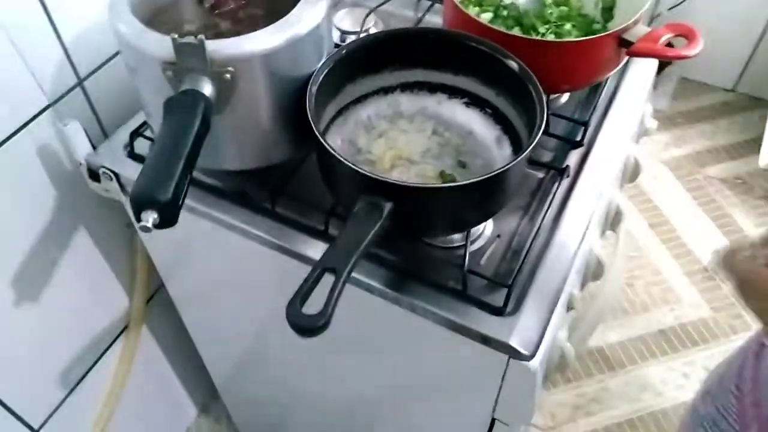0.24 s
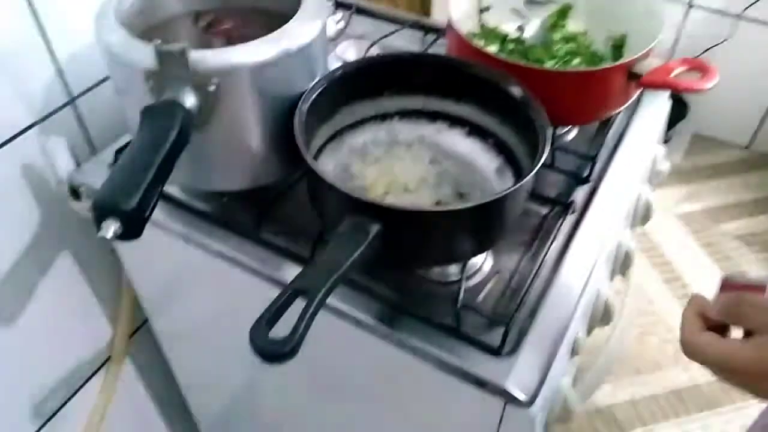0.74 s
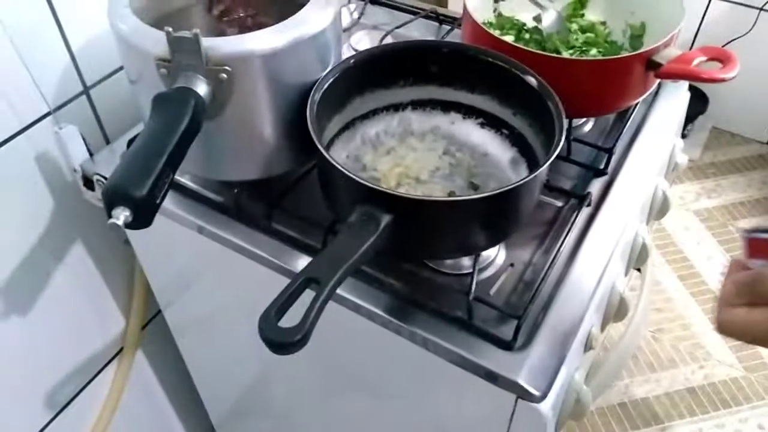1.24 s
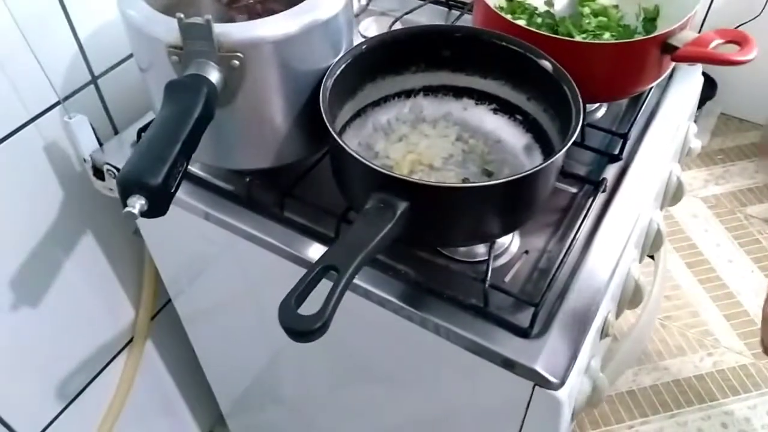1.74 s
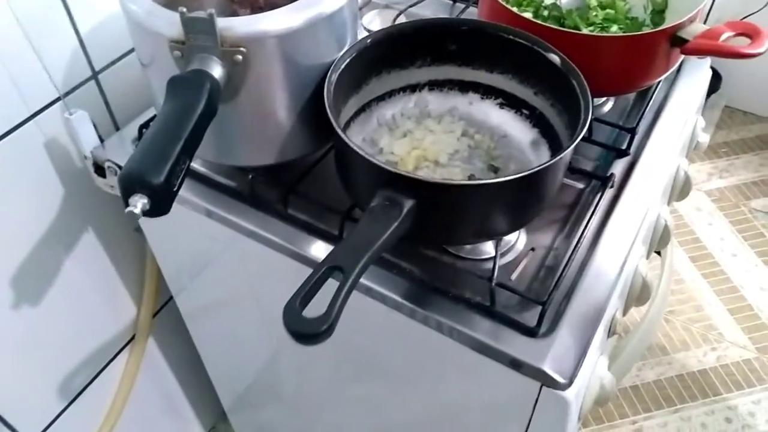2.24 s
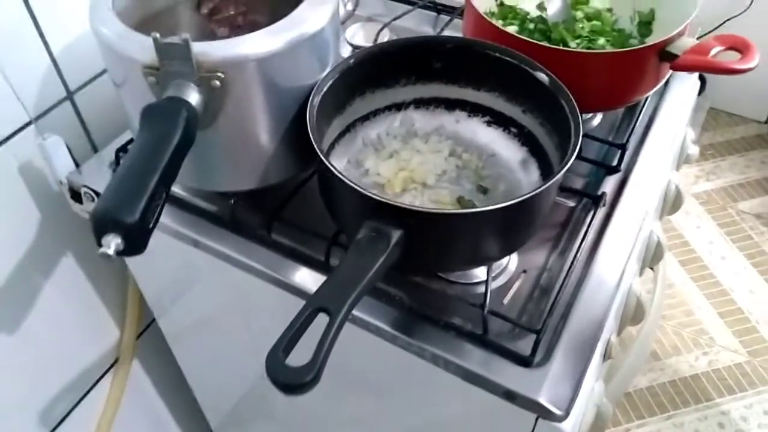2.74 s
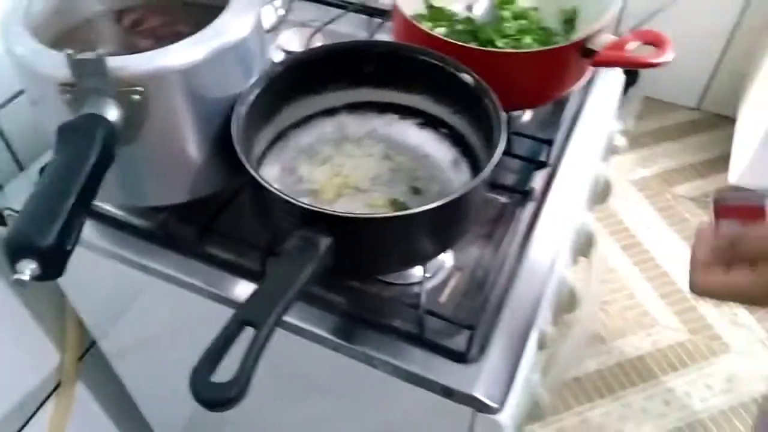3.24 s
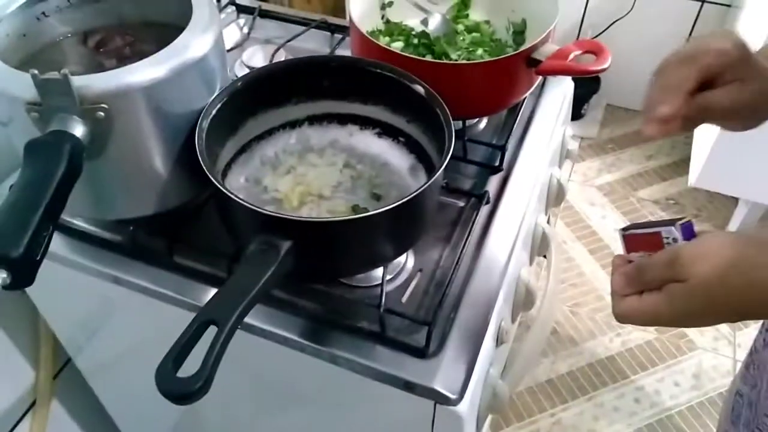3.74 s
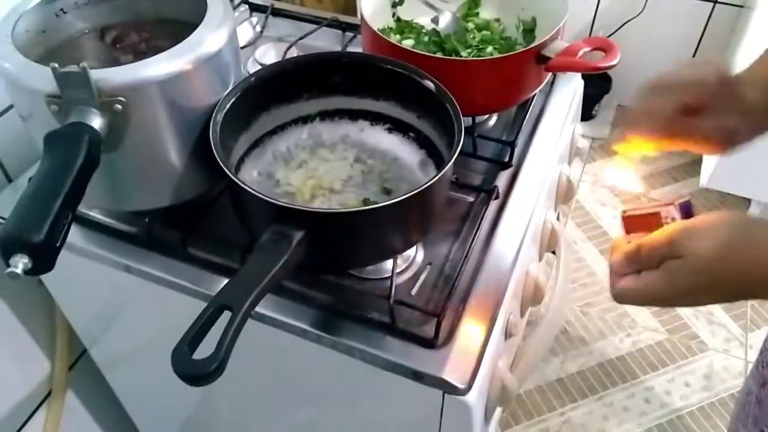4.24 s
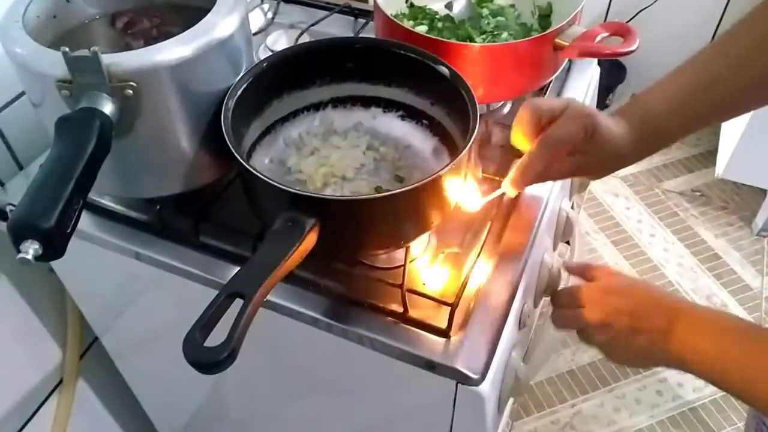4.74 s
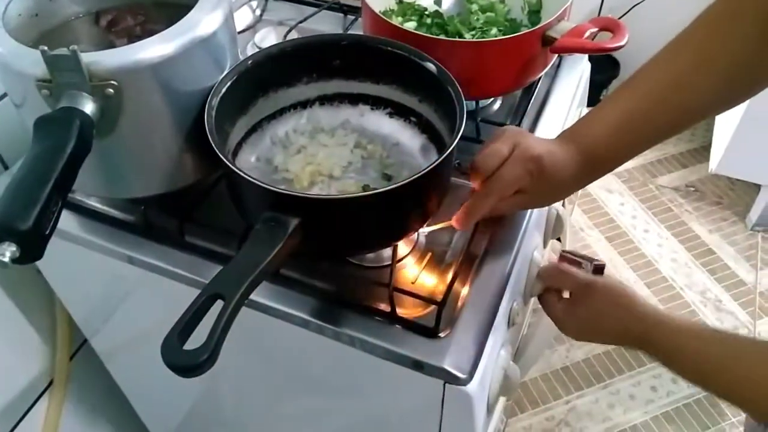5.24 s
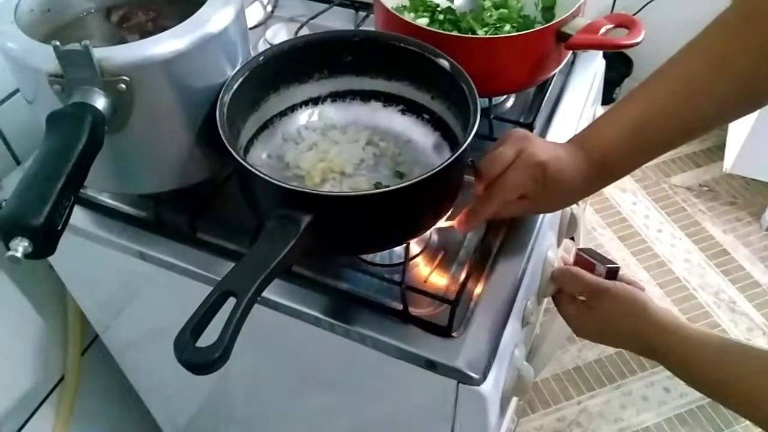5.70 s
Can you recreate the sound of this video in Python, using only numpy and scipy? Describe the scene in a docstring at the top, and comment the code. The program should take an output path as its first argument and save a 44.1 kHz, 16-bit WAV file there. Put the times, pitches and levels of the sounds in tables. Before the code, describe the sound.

A handheld stereo pickup hears faint stove hiss and hollow pot ringing. Matchsticks tick in a cardboard box, which clacks shut; a bright click briefly ducks the background. Then a match scratches and sputters, the gas knob chatters, and the burner lights with a soft boom. An engine outdoors gathers speed in the second half, droning through the room.

```python
"""A matchbox in a small tiled kitchen is rattled, slid open and snapped shut: friction grains and struck resonances.
A match is struck and flares as sputtering noise, a knob chatters, and a gas ring catches with a whoof and booms.
A pot hisses on the stove, as coloured noise with ringing air. Outside a vehicle gathers speed: engine
harmonics swell through the room's modes, over a road roar.
The snap and a sharp click at the microphone push the gain control down; the background creeps back after each."""
import sys
import numpy as np
from scipy import signal
from scipy.fft import rfft, irfft, next_fast_len
from scipy.io import wavfile
from scipy.ndimage import uniform_filter1d, minimum_filter1d

SR = 44100
rng = np.random.default_rng(int(sys.argv[2]) if len(sys.argv) > 2 else 0)


def file_out(sig):
    """Save sig as 16-bit WAV at sys.argv[1]."""
    # one column per channel
    cols = np.atleast_2d(sig).T
    # limit, then scale
    lim = np.clip(cols, -1, 1)
    pcm = np.round(lim * 32767).astype(np.int16)
    wavfile.write(sys.argv[1], SR, pcm)


N = 263056
TIME = np.arange(N) / SR
CUTOFF_HZ = 15500   # top of the band

# rubs of cardboard and sticks, among them the match on the strip at 3.95 s: (time [s], length [s],
# relative level [dB], treble [dB], resonance of the hollow box [Hz], resonance of its wall [Hz])
RUBS = [(-0.02, 0.041, -40, 7, 1510, 2480), (0.025, 0.11, -49, -4, 1560, 2360),
        (0.124, 0.076, -42.5, -19, 1410, 2740), (0.195, 0.031, -37, 2.5, 1520, 3040),
        (0.239, 0.04, -49, 4, 1510, 3060), (0.289, 0.04, -41, 9.5, 1550, 3280),
        (0.321, 0.037, -38, 4, 1680, 3420), (0.66, 0.057, -51.5, 10.5, 875, 4330),
        (1.283, 0.017, -31.5, 8, 1340, 3870), (1.649, 0.02, -35, -17, 2000, 3440),
        (1.669, 0.024, -28, 2.5, 1850, 3600), (1.79, 0.022, -53, 9, 1650, 3860),
        (2.364, 0.084, -51.5, -16, 1370, 4180), (2.483, 0.011, -40, -9, 1410, 3970),
        (2.98, 0.02, -48, -11, 1530, 1590), (3.946, 0.017, -25.5, 4.5, 965, 3770),
        (5.314, 0.078, -49, 4, 1670, 4160)]
# friction noise of the box: (frequency [Hz], density [dB per Hz])
FRICTION_SPECTRUM = [(100, -52), (400, -10), (750, 2), (1200, -5.5), (1650, 2.5), (2400, 5), (3400, -8.5),
                     (6000, -5.5), (10000, -13), (15000, -16)]


def scrapes(treble_hz=3500, wall_db=9.0):
    """Stick-slip friction: grains of contact excite the cavity and wall, each rub with its own treble."""
    grains = grit()
    body, bright = np.zeros(N), np.zeros(N)
    for s, length, db, treble_db, hollow_hz, wall_hz in RUBS:
        rub = from_db(db) * shaped(grains, rub_effort(s, length))
        hollow = resonance(rub, hollow_hz, width=280)
        wall = from_db(wall_db) * resonance(rub, wall_hz, width=290)
        body += rub + hollow + wall
        bright += rub * (from_db(treble_db) - 1)
    force = body + first_order_treble(bright, treble_hz)
    return from_db(6.0) * colour(force, FRICTION_SPECTRUM)


RUB_ATTACK, RUB_RELEASE = 0.26, 0.33   # rise time and decay constant, as shares of a rub's length


def rub_effort(start, length):
    """Envelope of a friction force: a linear rise, a hold and an exponential decay."""
    u = (TIME - start) / length
    return np.clip(u / RUB_ATTACK, 0, 1) * np.exp(-np.clip((u - 1) / RUB_RELEASE, 0, 20))


GRAINS_PER_S = 1300   # mean rate of tiny catches of one rough surface on the other, in each band


def grit(grain_spread_db=-1.0, smooth_share=0.39, slip_db=4.0, slips_per_s=230):
    """Random point process: fibres catch and slip on their own, so each band crackles in its own clumps."""
    out = 0
    edges_hz = np.geomspace(250, 16000, 7)   # octaves
    for low, high in zip(edges_hz, edges_hz[1:]):
        spread = np.minimum(rng.exponential(1, N), 3)
        sizes = from_db(grain_spread_db * spread) * rng.choice([-1, 1], N)
        catches = rng.random(N) < GRAINS_PER_S / SR
        grains = rms_one(sizes * catches) + smooth_share * rng.standard_normal(N)
        slips = from_db(slip_db * np.clip(drift(slips_per_s), -2, 2))
        band = signal.butter(2, [low, high], "band", fs=SR, output="sos")
        out = out + signal.sosfilt(band, grains * slips)
    return rms_one(out)


# knocks on the matchbox: (time [s], relative level [dB], crack relative to the knock [dB])
BOX_KNOCKS = [(0.201, -28, -13), (0.2195, -47, -5), (1.2802, -22, -22.5), (1.2817, -18, -24),
              (1.6763, 4.5, -23), (1.683, -19, -17), (1.6933, -26, -16)]
# modes of the hollow box: (frequency [Hz], level [dB], t60 [s])
BOX_MODES = [(830, -40, 0.024), (1076, -13, 0.012), (1440, -6, 0.0091), (1730, -8.5, 0.012),
             (3550, -25.5, 0.015), (6900, -13, 0.0025)]


def knocks(lowest_hz=380):
    """Impulse response: the drawer hits home with a crack and the brief ring of a box too small for bass."""
    crack = impulses([(s, db + crack_db) for s, db, crack_db in BOX_KNOCKS])
    hits = impulses([(s, db) for s, db, crack_db in BOX_KNOCKS])
    return high_pass(crack + ring(hits, BOX_MODES), lowest_hz)


# matchsticks tick against the box and each other: (time [s], relative level [dB], pitch [Hz])
STICK_TICKS = [(0.149, -37, 3080), (0.157, -32, 3050), (0.2018, -20, 2920), (0.208, -29, 1350),
               (0.214, -22, 3400), (0.2215, -22, 2900), (0.2265, -21, 3230), (0.232, -28, 3500),
               (0.235, -28, 3020), (0.3, -38, 1800), (0.3284, -33, 1680), (0.338, -21, 6100),
               (1.2885, -19.5, 3740), (1.296, -36, 3560), (1.3012, -28, 3470), (1.308, -22, 4370),
               (1.3283, -26, 3600), (1.334, -26, 3940), (1.654, -21.5, 2000), (1.655, -30, 3800),
               (1.6795, -16, 3750), (1.693, -17, 3400), (1.7075, -25, 4000), (2.446, -38, 1410),
               (2.4714, -33.5, 1520), (2.4874, -32, 3850), (2.4905, -27, 4100), (2.499, -35, 1350),
               (3.9482, -10, 11000), (3.9524, -22.5, 1170), (3.958, -30, 4100), (3.972, -26, 3800),
               (3.981, -28, 3200), (4.446, -30, 3850)]
STICK_CYCLES = 20   # t60 of a stick's fundamental, in cycles


def sticks(overtone=2.2, overtone_db=-9, crack_db=-3):
    """Modal decay of a struck bar: a dry crack, a fundamental and an overtone dying twice as fast."""
    out = 0
    for s, db, hz in STICK_TICKS:
        tap = impulses([(s, db)])
        t60 = STICK_CYCLES / hz
        overtone_hz = min(overtone * hz, CUTOFF_HZ)
        modes = [(hz, 0, t60), (overtone_hz, overtone_db, t60 / 2)]
        out = out + from_db(crack_db) * tap + ring(tap, modes)
    return high_pass(out, hz=710)


# the two impulses of a hard contact at the microphone: (time [s], relative level [dB])
CLICK_IMPULSES = [(3.3086, -4), (3.3103, 20.5)]


def sharp_click(crunch_db=-9.0):
    """Impulsive contact: two impulses, with a crunch of noise for a few milliseconds from the first."""
    contact = stroke(CLICK_IMPULSES[0][0], .002, edge=.4)
    crunch = from_db(crunch_db) * contact * rng.standard_normal(N)
    return high_pass(impulses(CLICK_IMPULSES) + crunch, hz=274)


# modes of the microphone's casing: (frequency [Hz], level [dB], t60 [s])
CASING_MODES = [(693, -56, 0.0018), (1850, -21.5, 0.0034), (3560, -19, 0.00097), (6660, -18, 0.004),
                (9040, -12, 0.0017), (11200, -10, 0.0012), (14100, -12, 0.00089)]


def casing_click():
    """Modal excitation: the sharp click is heard as the decaying ring of the casing."""
    return high_pass(ring(sharp_click(), CASING_MODES), hz=208)


# the gas knob turns in two short, hollow rasps: (time [s], length [s], relative level [dB])
KNOB_RASPS = [(5.066, 0.022, -26.5), (5.121, 0.03, -25.5)]
# resonances of the stove's front panel: (frequency [Hz], width [Hz], level [dB])
PANEL_MODES = [(717, 30, -6), (940, 170, -2.5), (1117, 23, -12)]


def knob(chatter_db=3, chatter_per_s=300, lowest_hz=600):
    """Forced vibration: the valve stem rubs and chatters, driving the thin panel at its resonances."""
    chatter = from_db(chatter_db * drift(chatter_per_s))
    rub = high_pass(rng.standard_normal(N) * chatter, lowest_hz)
    rung = 0
    for hz, width, db in PANEL_MODES:
        mode = resonance(resonance(rub, hz, width), hz, 2 * width)
        rung = rung + from_db(db) * rms_one(mode)
    return sum(from_db(db) * shaped(rung, stroke(s, length, edge=0.35)) for s, length, db in KNOB_RASPS)


# the match head bursts into flame with a broad rasp: (time [s], level [dB], decay constant [s])
IGNITION_RASP = [(3.965, -27.5, 0.1)]
# it flares as it catches and again as it is carried to the ring: (time [s], length [s], level [dB])
MATCH_FLARES = [(3.95, 0.14, -46), (4.44, 0.39, -47)]


def flare(fizz_hz=3900, width_hz=1300, sputter_db=3.0, crackle_db=4.0, spit_hz=2200, spit_width_hz=500):
    """Combustion noise: a crackling, dying rasp, then a narrow, sputtering fizz with lower, gritty spits."""
    (start, rasp_db, decay_s), = IGNITION_RASP
    burst = from_db(rasp_db) * (TIME > start) * np.exp(-np.abs(TIME - start) / decay_s)
    crackle = diffuse(N) * from_db(crackle_db * drift(250))
    rasp = burst * rms_one(colour(crackle, FRICTION_SPECTRUM))
    burn = sum(from_db(db) * stroke(s, length, edge=0.52) for s, length, db in MATCH_FLARES)
    narrow = resonance(resonance(diffuse(N), fizz_hz, width_hz), fizz_hz, 2 * width_hz)
    fizz = from_db(sputter_db * drift(130)) * rms_one(narrow)
    spits = rms_one(resonance(grit(), spit_hz, spit_width_hz))
    return rasp + burn * (fizz + spits)


# the knob lets gas hiss from the ring: (time [s], opening time [s], level [dB])
GAS_OPENING = [(5.085, 0.017, -52)]


def gas(lowest_hz=8000):
    """Turbulent jet noise: a thin, bright hiss that grows as the valve opens."""
    (start, opening_s, db), = GAS_OPENING
    flow = np.clip((TIME - start) / opening_s, 0, 1)
    jet = rms_one(high_pass(colour(diffuse(N), STOVE_HISS), lowest_hz))
    return flow * from_db(db) * jet


# the gas catching: (frequency [Hz], density [dB per Hz])
WHOOF_SPECTRUM = [(40, -30), (100, -10), (150, -14), (230, 6.5), (450, -2), (680, 0.5), (950, -9.5),
                  (2000, -29), (8000, -52)]
# the flame jumps round the ring in booming puffs, each sinking in pitch:
# (time [s], length [s], level [dB], pitch [Hz], glide [Hz per s])
FLAME_PUFFS = [(5.53, 0.028, -38, 133, -350), (5.578, 0.039, -32.5, 186, -900),
               (5.632, 0.045, -39.5, 146, -300)]


def burner(start=5.54, length=0.135, level_db=-35, flutter_hz=110, flutter=0.21,
           pan_hz=690, pan_width_hz=45, pan_db=6.0):
    """Amplitude modulation: the catching gas flutters and booms, and the resonance of the pan rings along."""
    phase = 2 * np.pi * np.cumsum(flutter_hz * (1 + 0.062 * drift(40))) / SR
    fluttering = diffuse(N) * np.exp(flutter * np.cos(phase))
    flame = stroke(start, length, edge=0.26) * rms_one(colour(fluttering, WHOOF_SPECTRUM))
    pan_ring = (from_db(pan_db) - 1) * resonance(flame, pan_hz, pan_width_hz)
    booms = 0
    for s, puff_length, db, hz, glide in FLAME_PUFFS:
        booms = booms + from_db(db) * tone(s, puff_length, hz, glide, waver=0.03, edge=0.64)
    return from_db(level_db) * (flame + pan_ring) + booms


# soft shuffling of hands and clothes: (time [s], length [s], level [dB])
CLOTH_SHUFFLES = [(0.392, 0.15, -51), (0.59, 0.17, -49), (1.068, 0.11, -52), (1.48, 0.061, -77),
                  (2.851, 0.22, -46.5)]
# its dull colour: (frequency [Hz], density [dB per Hz])
CLOTH_SPECTRUM = [(30, -3), (120, -4), (380, 18.5), (750, 13.5), (1300, 9.5), (2000, 6), (6000, -95)]


def shuffles():
    """Modulated friction noise: dull, lumpy rustles as the cook moves."""
    effort = sum(from_db(db) * stroke(s, length, edge=0.37) for s, length, db in CLOTH_SHUFFLES)
    lumps = from_db(3 * drift(50))
    return effort * lumps * rms_one(colour(diffuse(N), CLOTH_SPECTRUM))


# the engine picks up speed: (time [s], firing rate [firings per s])
FIRING_RATE = [(2.4, 39.7), (3.1, 42.3), (3.4, 43), (3.7, 45.6), (4.15, 47.5), (4.5, 48), (4.79, 50.6),
               (5.2, 51.5), (5.5, 52.3), (5.96, 55.3)]
# its hum grows as it works harder: (time [s], level before weighting by harmonic [dB])
ENGINE_EFFORT = [(0, -17), (2.3, -19), (2.8, -3), (3.25, -4.5), (3.5, -4), (4.0, 1.5), (4.45, -1),
                 (4.75, 0.5), (5.0, 1.5), (5.96, 0.5)]
# harmonics: (multiple of the firing rate, relative level [dB], left minus right [dB], left lead [rad])
ENGINE_HARMONICS = [(1, 1.5, 0, 0.3), (2, 0, -6, 1.17), (3, -1, -16, 0.71), (4, 2.5, -4, 0.7),
                    (5, 0.5, -1, 0.62), (6, -0.5, -5, 0.6), (7, 1, -4, 0.6)]
# room modes that pick out the harmonics: (frequency [Hz], width [Hz], gain [dB])
ROOM_MODES = [(54.7, 3.5, -49.5), (86.2, 10.3, -47.5), (101.6, 5.1, -44.5), (146.8, 6, -48.5),
              (206, 6.2, -54), (222.5, 7.1, -47), (256, 8, -50.5), (320.7, 14, -53), (364.4, 15, -56.5)]
# road roar heard indoors: (frequency [Hz], density [dB per Hz])
ROAR_SPECTRUM = [(25, -30), (45, -17), (70, -16), (120, 0.5), (280, 6), (500, 0), (850, -0.5), (1300, -5.5),
                 (1900, -9), (3500, -18), (6000, -26), (15000, -38)]
ROAR_DB = -32.5   # mean level of the roar at the nearest point
# time of nearest approach, distance then, and the constant speed that shapes the roar's level
PASS_S, DISTANCE_M, SPEED_M_PER_S = 4.777, 6.58, 17.6


def vehicle(rough_db=1.5, brighten=0.75):
    """Harmonic series through room modes, the upper harmonics growing fastest; the roar follows 1/distance."""
    firing_hz, = in_time(FIRING_RATE)
    hum_db, = in_time(ENGINE_EFFORT)
    distance_m = np.hypot(SPEED_M_PER_S * (TIME - PASS_S), DISTANCE_M)
    nearness = DISTANCE_M / distance_m
    phase = 2 * np.pi * np.cumsum(firing_hz * (1 + 0.0065 * drift(13))) / SR
    engine = 0
    for k, db, pan_db, lead in ENGINE_HARMONICS:
        start_phase = rng.uniform(0, 2 * np.pi)
        wave = np.sqrt(2) * np.sin(k * phase + start_phase + np.array([[lead], [0]]))
        level_db = db + hum_db * k ** brighten + rough_db * drift(8)
        engine = engine + pan(pan_db) * wave * from_db(level_db)
    hum = 0
    for k, (hz, width, db) in enumerate(ROOM_MODES):
        hum = hum + (-1) ** k * from_db(db) * resonance(engine, hz, width)   # neighbours in opposite phase
    surges = from_db(.7 * drift(14))
    roar = surges * rms_one(colour(diffuse(N), ROAR_SPECTRUM))
    return hum + from_db(ROAR_DB) * nearness * roar


# other low tones in the traffic: (time [s], length [s], level [dB], pitch [Hz], glide [Hz per s],
# left minus right [dB])
TRAFFIC_TONES = [(3.09, 0.19, -49.5, 335, 27, -4), (3.55, 0.75, -46.5, 235, -9, -3),
                 (4.06, 0.4, -44, 336, -2, -7), (4.59, 0.13, -43, 338, 30, -1)]


def drones():
    """Gliding sinusoids: low tones swell and fade in the sound of the street."""
    out = 0
    for s, length, db, hz, glide, pan_db in TRAFFIC_TONES:
        out = out + from_db(db) * pan(pan_db) * tone(s, length, hz, glide, waver=0.008, edge=0.45)
    return out


# hiss of the stove and room: (frequency [Hz], density [dB per Hz])
STOVE_HISS = [(25, -30), (50, 3), (70, 2), (95, 11.5), (200, 4), (400, 1.5), (800, -10), (1300, -30),
              (2000, -65), (2500, -3), (3100, -7), (4200, -5.5), (8000, -5.5), (15000, -14.5)]
# gain of the treble in the hiss: (time [s], gain [dB])
TREBLE_GAIN = [(0, 5), (0.6, -0.5), (0.76, 2), (0.95, 1), (1.6, 1.5), (2.0, 0.5), (2.39, 0), (2.44, 6.5),
               (2.6, 2.5), (3.2, 3), (3.8, 3.5), (4.56, 3.5), (4.68, 4), (5.0, 1), (5.96, 2)]
# air ringing in the pots: (frequency [Hz], width [Hz], level [dB])
POT_MODES = [(669, 64, -56.5), (901, 14, -66), (1178, 29, -61), (1731, 23, -59)]
HISS_DB = -47   # level of the hiss before the treble gain
MAINS_HZ, MAINS_DB = 119, -62   # a kitchen appliance hums throughout


def stove(treble_hz=4200):
    """Broadband noise and cavity resonance: a hiss of varying treble, the pots' hollow ring and a faint hum."""
    hiss = from_db(HISS_DB) * rms_one(colour(diffuse(N), STOVE_HISS))
    sizzle_db, = in_time(TREBLE_GAIN)
    treble = first_order_treble(hiss, treble_hz)
    air = diffuse(N)
    pots = sum(from_db(db) * rms_one(resonance(air, hz, width)) for hz, width, db in POT_MODES)
    mains = from_db(MAINS_DB) * np.sqrt(2) * np.sin(2 * np.pi * MAINS_HZ * TIME)
    return hiss + (from_db(sizzle_db) - 1) * treble + pots + mains


# kitchen reverberation: (frequency [Hz], t60 [s])
KITCHEN_T60 = [(150, 0.36), (1200, 0.5), (4000, 0.46), (8000, 0.42), (15000, 0.38)]


def kitchen(x, build_s=0.00014):
    """Reverberation by convolution: dense echoes off the tiles, each band decaying at its own rate."""
    t, out = TIME[:SR // 2], 0
    echoes = diffuse(len(t))
    edges_hz = np.geomspace(80, 18000, 9)
    spectrum, hz = rfft(echoes), np.fft.rfftfreq(len(t), 1 / SR)
    for low, high in zip(edges_hz, edges_hz[1:]):
        band = irfft(spectrum * ((hz >= low) & (hz < high)), len(t))
        t60 = at_hz(KITCHEN_T60, np.sqrt(low * high))
        out = out + band * np.exp(-np.log(1000) * t / t60)
    out = rms_one(out * (1 - np.exp(-t / build_s))) / np.sqrt(len(t))
    return signal.fftconvolve(x[None], out, axes=1)[:, :N]


# width of diffuse sound: (frequency [Hz], side minus mid [dB])
DIFFUSE_WIDTH = [(60, 10), (200, 0.5), (380, -4), (700, -7), (1100, -12.5), (1800, 1), (2500, 2.5),
                 (4400, 5.5), (8000, 1.5), (15000, 1.5)]


def diffuse(size):
    """Diffuse field: white stereo noise as two close ports hear it from all sides."""
    mid, side = rng.standard_normal((2, size))
    return rms_one(mid + colour(side, DIFFUSE_WIDTH) * np.array([[1], [-1]]))


def from_right(x, count=1):
    """Interaural-style delay: sound from the right reaches the left port count samples late."""
    return np.array([np.roll(x, count), x])


def pan(db):
    """Level difference: gains of the two channels for a left minus right level."""
    return from_db(np.array([[db], [-db]]) / 2)


def tone(start, length, hz, glide, waver=0.015, edge=0.45):
    """Frequency modulation: a low tone swells, glides and fades, never quite steady."""
    pitch = (hz + glide * np.clip(TIME - start, 0, 2 * length)) * (1 + waver * drift(40))
    phase = 2 * np.pi * np.cumsum(pitch) / SR + rng.uniform(0, 2 * np.pi)
    return stroke(start, length, edge) * np.sqrt(2) * np.sin(phase)


def resonance(x, hz, width):
    """Damped resonator: a two-pole band-pass with about unit gain at its peak."""
    r = np.exp(-np.pi * width / SR)
    feedback = [1, -2 * r * np.cos(2 * np.pi * hz / SR), r * r]
    return signal.lfilter(np.array([1, 0, -1]) * (1 - r * r) / 2, feedback, x + 1e-18)


def ring(x, modes):
    """Modal superposition: each click sets decaying sines going."""
    out = 0
    for hz, db, t60 in modes:
        r, w = np.exp(-np.log(1000) / (t60 * SR)), 2 * np.pi * hz / SR
        mode = signal.lfilter([0, np.sin(w)], [1, -2 * r * np.cos(w), r * r], x + 1e-18)
        out = out + from_db(db) * mode
    return out


def impulses(rows):
    """Unit impulse scaled in level: one click for each (time [s], level [dB])."""
    out = np.zeros(N)
    for s, db in rows:
        out[round(s * SR)] += from_db(db)
    return out


def stroke(start, length, edge):
    """Trapezoidal envelope: ramps last edge * length, and the fall begins at start + length."""
    u = (TIME - start) / length
    return np.clip(np.minimum(u, 1 + edge - u) / edge, 0, 1)


def shaped(x, envelope):
    """Energy normalisation: give x an envelope and exactly that envelope's energy."""
    return x * envelope * np.sqrt(np.sum(envelope ** 2) / np.sum((x * envelope) ** 2))


def drift(rate):
    """Random modulation: normal values, rate per second, joined by straight lines."""
    return np.interp(TIME * rate, np.arange(4000), rng.standard_normal(4000))


def in_time(rows):
    """Linear interpolation: join the rows of a curve over time."""
    s, *columns = np.transpose(rows)
    return [np.interp(TIME, s, c) for c in columns]


def high_pass(x, hz):
    """Second-order high-pass: thin out the bass."""
    return signal.sosfilt(signal.butter(2, hz, "high", fs=SR, output="sos"), x + 1e-18)


def first_order_treble(x, hz):
    """First-order high-pass: the gently sloping treble part of a sound."""
    return signal.sosfilt(signal.butter(1, hz, "high", fs=SR, output="sos"), x)


def colour(x, spectrum):
    """Spectral weighting: give a signal a smooth spectrum."""
    size = next_fast_len(x.shape[-1])
    gain = from_db(at_hz(spectrum, np.fft.rfftfreq(size, 1 / SR)))
    return irfft(rfft(x, size) * gain, size)[..., :x.shape[-1]]


def at_hz(points, hz):
    """Logarithmic pitch scale: read a table on a log-frequency axis."""
    points = np.array(points)
    return np.interp(np.log(hz + 1e-9), np.log(points[:, 0]), points[:, 1])


def rms_one(x):
    """Power normalisation: scale to unit mean square."""
    return x / np.sqrt(np.mean(x ** 2) + 1e-20)


def from_db(db):
    """Logarithmic level: decibels to amplitude gain."""
    return 10 ** (np.asarray(db) / 20)


def scene():
    """Superposition: hand sounds and their echoes, over stove and street."""
    rub, knock, turn = scrapes(), knocks() + sticks(), knob()
    # the casing rings only at the microphone; the room hears the bare snap
    click = casing_click()
    snap = high_pass(impulses(CLICK_IMPULSES[-1:]), hz=300)
    direct = from_right(from_db(-3.5) * rub + knock + click + from_db(-3.5) * turn)
    room = kitchen(rub + from_db(-4.0) * knock + from_db(-6.5) * snap + from_db(-5.5) * turn)
    flames = flare() + gas() + burner()
    background = shuffles() + vehicle() + drones() + stove()
    return direct + room + flames + background


def equalise(x, peaks):
    """Resonant filtering in series: a chain of peaks and notches."""
    for hz, width, db in peaks:
        x = x + (from_db(db) - 1) * resonance(x, hz, width * from_db(-db / 2))
    return x


def gain_control(x, release_db_per_s=9.0):
    """Peak limiting: a peak over the ceiling pulls the gain down at once; it climbs back slowly."""
    ceiling_db = -1.6
    over = np.maximum(20 * np.log10(np.abs(x).max(axis=0) + 1e-9) - ceiling_db, 0)
    release_db = release_db_per_s * TIME
    cut = np.maximum.accumulate(over + release_db) - release_db
    # hold and smooth the gain over a millisecond or two
    return x * from_db(uniform_filter1d(minimum_filter1d(-cut, size=81), size=61))


# microphone colour of the sum of both ports: (frequency [Hz], width [Hz], gain [dB])
SUM_COLOUR = [(1261, 286, 8.5), (2356, 146, -32.5), (2580, 62, -26.5), (3760, 2830, 6), (4900, 1010, -6),
              (7390, 770, -7.5), (8470, 660, 4), (11550, 490, 3.5), (13700, 540, 4)]
# the ports comb the left-right difference in the gaps of their sum: (frequency [Hz], width [Hz], gain [dB])
DIFFERENCE_COLOUR = [(3640, 430, -20.5), (4940, 1400, 2), (6300, 600, -13.5), (8600, 430, -2),
                     (11700, 1900, 0.5)]


def record(dry, right_db=0.66):
    """Two-port pickup: sum and difference are coloured, the right gains, gain control acts, the top is cut."""
    mid = equalise((dry[0] + dry[1]) / 2, SUM_COLOUR)
    side = equalise((dry[0] - dry[1]) / 2, DIFFERENCE_COLOUR)
    heard = np.array([from_db(-right_db) * (mid + side), from_db(right_db) * (mid - side)])
    top_cut = signal.cheby2(16, 60, CUTOFF_HZ + 600, fs=SR, output="sos")
    return signal.sosfilt(top_cut, gain_control(heard))


dry = scene()
out = record(dry)
file_out(out)
```